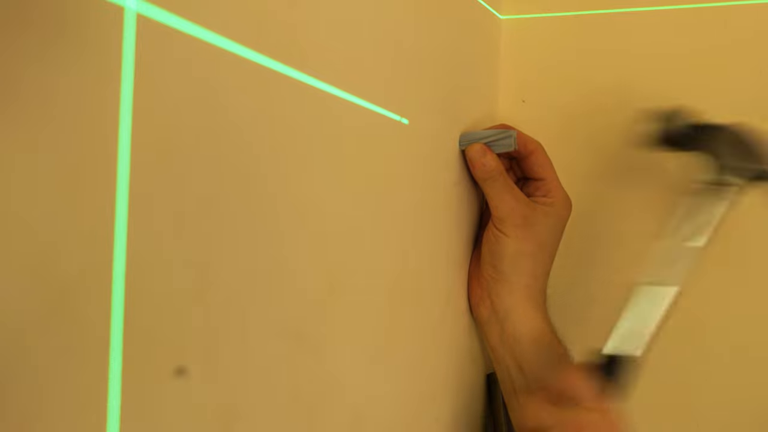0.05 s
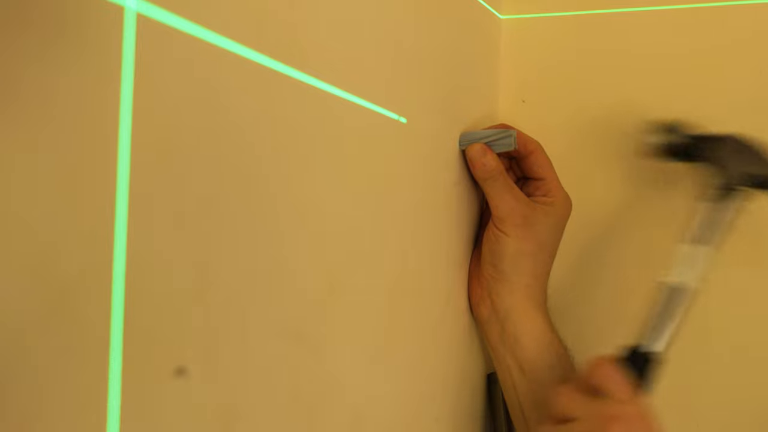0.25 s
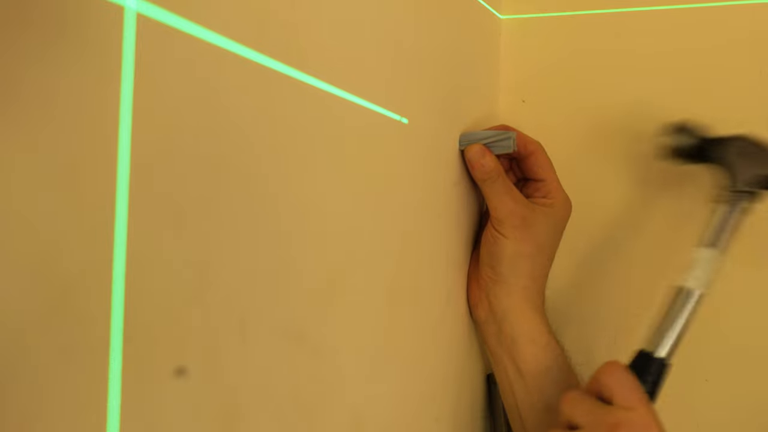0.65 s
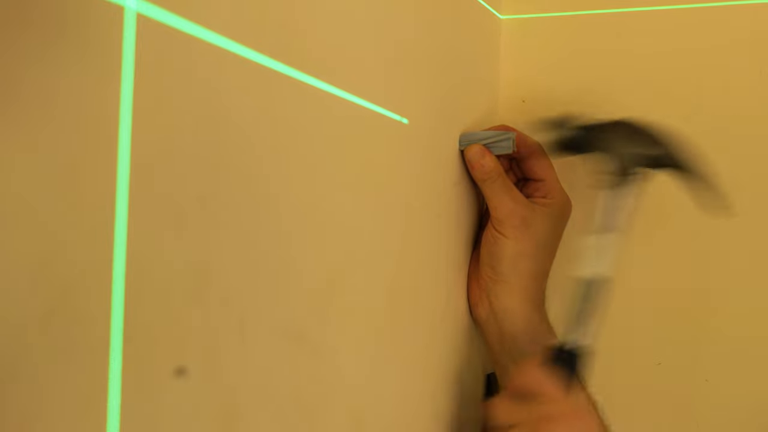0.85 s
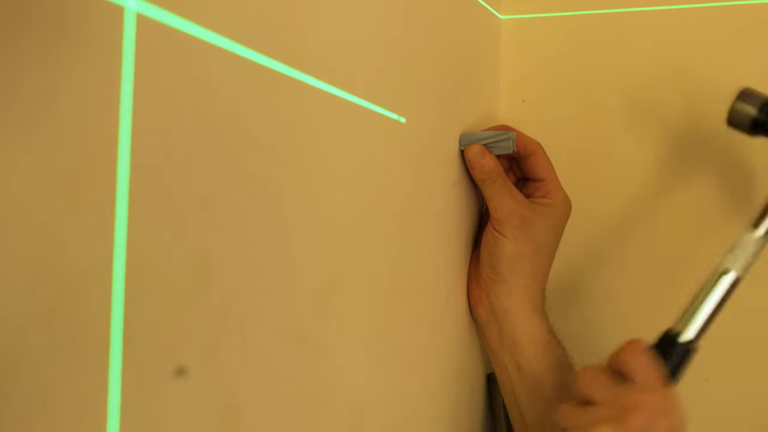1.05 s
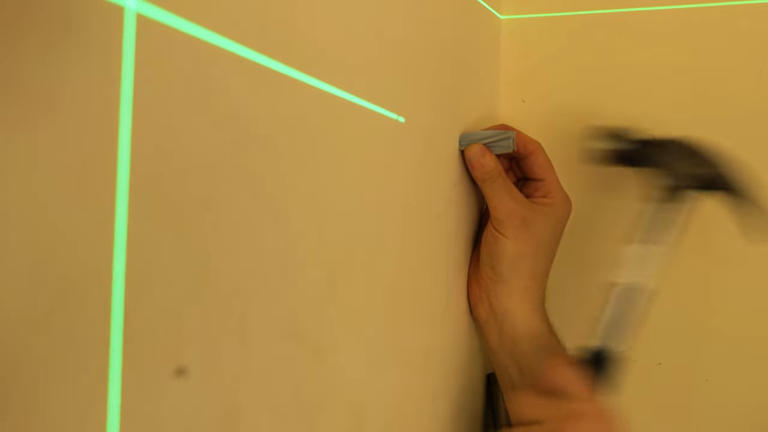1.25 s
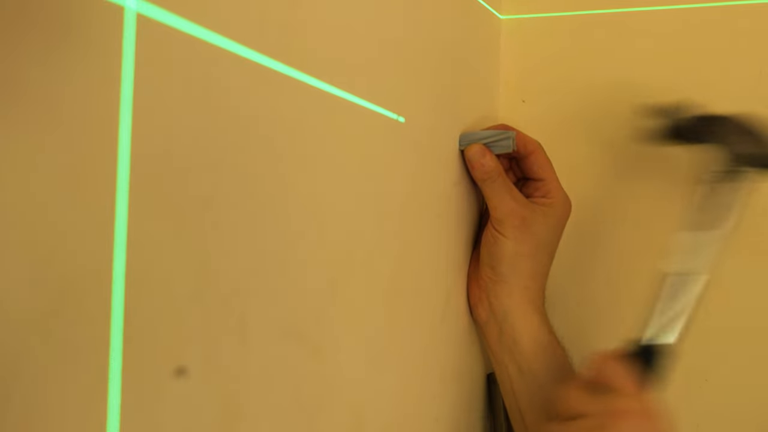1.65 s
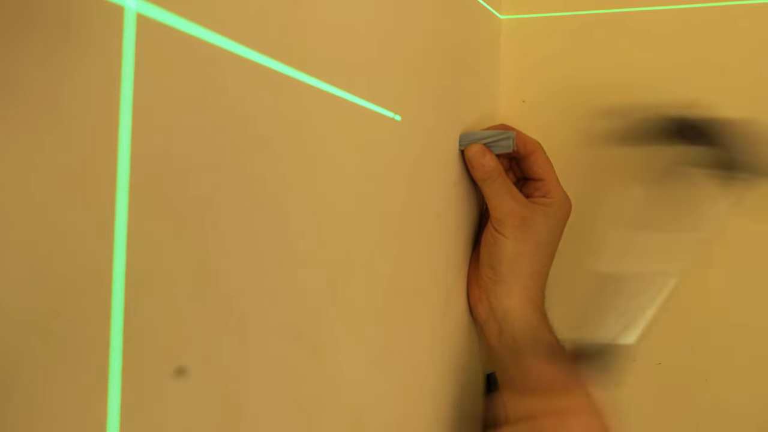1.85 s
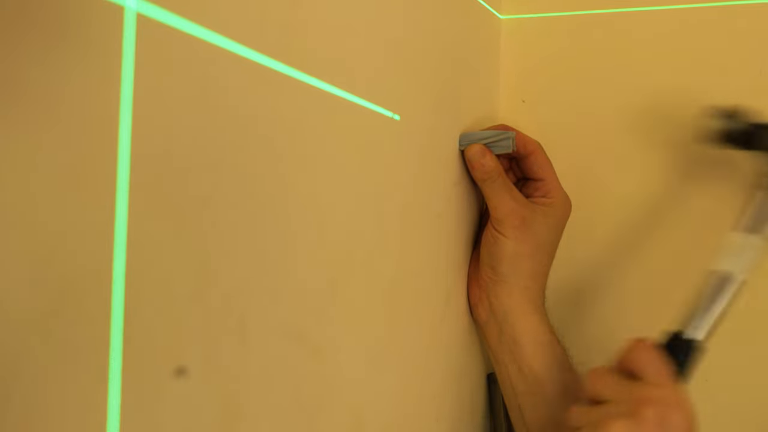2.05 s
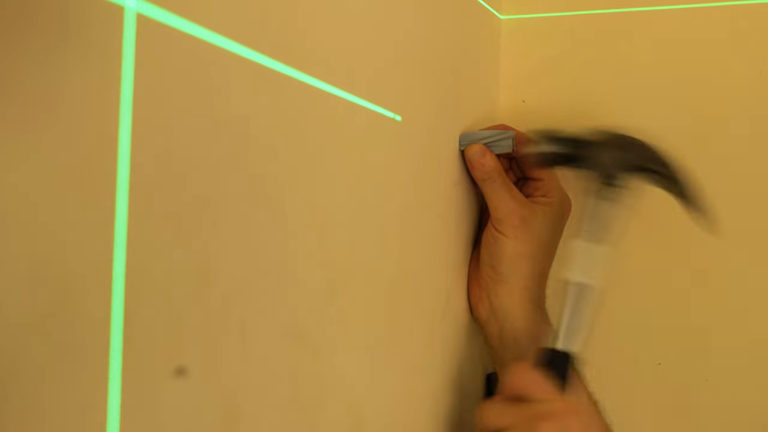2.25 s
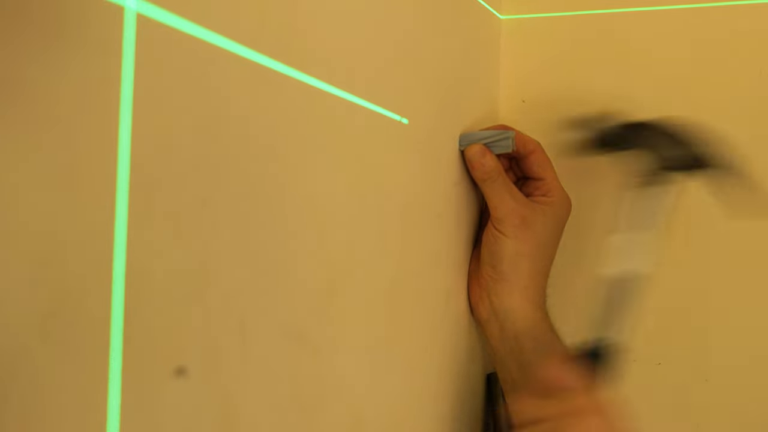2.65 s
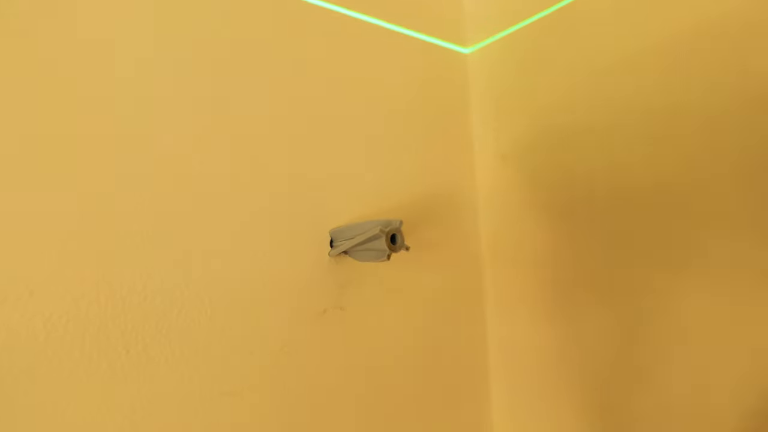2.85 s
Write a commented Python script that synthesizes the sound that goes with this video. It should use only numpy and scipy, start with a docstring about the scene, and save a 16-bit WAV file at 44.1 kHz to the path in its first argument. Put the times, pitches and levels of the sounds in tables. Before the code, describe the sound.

A hammer taps an anchor into a plasterboard wall, close by. Eight evenly spaced blows run from about 0.2 to 2.7 seconds, each a sharp tick over a hollow, booming thud with a short small-room echo. The ticks grow brighter from around 0.9 seconds, with a faint metal ring. The last blow's echo dips abruptly, leaving a faint low rumble over the quiet room hum.

```python
"""Sharp ticks over a hollow boom, about three a second: a steel hammer taps an anchor into plasterboard.
Each blow cracks on the anchor, pushes air off the board and sets the wall's modes booming.
The tick brightens as the anchor bites, and the hammer head rings faintly.
A small room answers over a low hum, and the close microphone flattens every peak."""
import sys
import numpy as np
from scipy import signal
from scipy.fft import rfft, irfft, next_fast_len
from scipy.io import wavfile

SR = 44100
rng = np.random.default_rng(int(sys.argv[2]) if len(sys.argv) > 2 else 0)


def transcribe(signal):
    """Save signal, clipped to [-1, 1], as a 16-bit WAV file at the path in sys.argv[1]."""
    frames = np.atleast_2d(signal).T
    limited = np.clip(frames, -1, 1)
    pcm = np.round(limited * 32767).astype(np.int16)
    wavfile.write(sys.argv[1], SR, pcm)


N = 132300


def undb(db):
    """Decibels to gain."""
    return 10 ** (np.asarray(db) / 20)


def along(points, hz):
    """Read (Hz, value) points on a log-frequency axis."""
    freqs, values = np.array(points, float).T
    return np.interp(np.log(np.maximum(hz, 1)), np.log(freqs), values)


def colour(x, points):
    """Minimum-phase EQ through (Hz, dB) points: nothing rings ahead of an attack."""
    n = x.shape[-1]
    size = 2 * next_fast_len(n // 2 + SR // 10)
    gain = undb(along(points, np.fft.rfftfreq(size, 1 / SR)))
    cepstrum = irfft(np.log(gain), size)
    cepstrum[1:size // 2] *= 2
    cepstrum[size // 2 + 1:] = 0
    return irfft(rfft(x, size) * np.exp(rfft(cepstrum)), size)[..., :n]


def ring(modes, t):
    """Struck modes: decaying sines that start at t = 0."""
    t = np.maximum(t, 0)
    return sum(undb(db) * np.sin(2 * np.pi * hz * t) * np.exp(-np.log(1000) * t / t60)
               for hz, db, t60 in modes)


def unit(x):
    """Scale each channel to an energy of 1."""
    return x / np.sqrt(np.sum(x ** 2, axis=-1, keepdims=True))


def widen(pair, side_db):
    """Turn two unrelated signals, as mid and side, into left and right."""
    return pair[0] + undb(side_db) * pair[1] * np.array([[1], [-1]])


def add(out, x, start):
    """Mix x into out at a start time in seconds."""
    i = int(round(start * SR))
    a, b = max(i, 0), min(i + x.shape[-1], N)
    out[:, a:b] += x[:, a - i:b - i]


# The dark bed of room air. Each row: frequency in Hz, relative level in dB.
AIR_EQ = [(20, -7.5), (50, -5.5), (130, -12.5), (250, -17), (500, -26.5), (1200, -33.5), (2500, -43),
          (6000, -44), (10000, -48), (16000, -61.5)]
# The deep rumble. Each row: frequency in Hz, relative level in dB.
RUMBLE_EQ = [(15, -17.5), (35, 1.5), (70, -1.5), (140, -7), (300, -24.5), (1000, -67.5)]
AIR_DB, HUM_HZ, HUM_DB = -67, 135, -66.5
RUMBLE_START_S, RUMBLE_RISE_S, RUMBLE_DB = 2.78, 0.02, -47.5

def room_tone():
    """Quiet air, a low hum and a rumble that swells in at the end."""
    t = np.arange(N) / SR
    air = unit(colour(rng.standard_normal(N), AIR_EQ)) * np.sqrt(N)
    rumble = unit(colour(rng.standard_normal(N), RUMBLE_EQ)) * np.sqrt(N)
    hum = np.sqrt(2) * np.sin(2 * np.pi * HUM_HZ * t)
    swell = np.clip((t - RUMBLE_START_S) / RUMBLE_RISE_S, 0, 1)
    return undb(AIR_DB) * air + undb(HUM_DB) * hum + undb(RUMBLE_DB) * swell * rumble


# The tail's decay before it dies away faster. Each row: frequency in Hz, seconds to fall 60 dB.
TAIL_DECAY = [(60, .38), (300, 0.48), (1000, 0.26), (3000, 0.27), (7000, 0.31), (10000, 0.22),
              (15000, 0.35)]
ROOM_LAG_S, ROOM_BUILD_S = 0.0042, 0.001
TAIL_KNEE_S, TAIL_LATE_FALL = 0.17, 0.4  # past the knee the tail falls 40% faster
THUD_SIDE_DB, TICK_SIDE_DB = -27.5, -19.5  # stereo width

def room_tail(t, eq, side_db):
    """Dense reflections, nearly the same left and right; the lows hang on longest."""
    hz = np.fft.rfftfreq(len(t), 1 / SR)
    edges = np.r_[0, np.geomspace(90, SR / 2, 13)]
    noise = rfft(rng.standard_normal((2, len(t))))
    age = np.maximum(t - ROOM_LAG_S, 0)
    fall = age + TAIL_LATE_FALL * np.maximum(age - TAIL_KNEE_S, 0)
    build = 1 - np.exp(-age / ROOM_BUILD_S)
    tail = 0
    for lo, hi in zip(edges[:-1], edges[1:]):
        band = irfft(noise * ((hz >= lo) & (hz < hi)), len(t))
        envelope = build * np.exp(-np.log(1000) * fall / along(TAIL_DECAY, (lo + hi) / 2))
        tail = tail + unit(band * envelope) * np.sqrt(2 * (hi - lo) / SR)
    return widen(colour(tail, eq), side_db)


# The boom: modes of the wall and the corner in front of it.
# Each row: pitch in Hz, level in dB, seconds to fall 60 dB.
WALL_MODES = [(54.4, -27, 0.67), (62, -35.5, 0.13), (76.3, -31, 0.33), (83.2, -30.5, 0.43), (99, -29, 0.42),
              (122.5, -26.5, 0.33), (134.86, -28, 0.48), (152, -27.5, 0.3), (198.5, -32.5, 0.36),
              (245.2, -29.5, 0.28), (286, -33, 0.26), (297.5, -29.5, 0.32), (317, -32, 0.13),
              (351, -31.5, 0.24), (419.8, -27.5, 0.14), (447.2, -41, 0.24), (517.3, -31.5, 0.28)]
# The knock of the board around the anchor. Each row: pitch in Hz, level in dB, seconds to fall 60 dB.
BOARD_MODES = [(475, -11.5, 0.019), (576, -40, 0.13), (619, -32.5, 0.11), (739, -35, 0.12),
               (756, -38.5, .22), (831, -42.5, 0.28), (942.3, -47, 0.4), (1017, -36, 0.23),
               (1072.4, -18, 0.026), (1162, -31.5, .13)]
# The push slapping back off nearby walls. Each row: delay in seconds, gain.
EARLY_ECHOES = [(.0078, 0.042), (0.013, .26), (0.0184, -.33), (.0445, .1)]
# The room's warm answer to the thud. Each row: frequency in Hz, gain in dB.
THUD_TAIL_EQ = [(25, -2), (60, 6), (130, 11.5), (320, 15.5), (430, 8.5), (560, 9.5), (720, 9.5),
                (1100, 10.5), (1400, -7), (2200, -17), (5000, -53)]
PUSH_S, PUSH_DB = 0.0019, -6
BOARD_LAG_S, WALL_LAG_S = 0.00052, 0.0017

def wall_thud(t):
    """The board gives way and pushes the air, the whole wall swings back, and the room answers."""
    def push(lag):
        progress = np.clip((t - BOARD_LAG_S - lag) / PUSH_S, 0, 1)
        return undb(PUSH_DB) * np.sin(np.pi * progress) ** 2
    boom = ring(BOARD_MODES, t - BOARD_LAG_S) - ring(WALL_MODES, t - WALL_LAG_S)
    slaps = sum(gain * push(lag) for lag, gain in EARLY_ECHOES)
    return push(0) + boom + slaps + room_tail(t, THUD_TAIL_EQ, THUD_SIDE_DB)


# The hard edge of the contact. Each row: frequency in Hz, gain in dB.
CRACK_EQ = [(300, -16.5), (900, 11), (1300, 9), (2000, -2.5), (4300, -2), (5600, -3.5), (7500, 1),
            (10000, -10), (13000, -6), (16000, -10.5)]
CRACK_DECAY_S = 0.0025

def contact_crack(t):
    """Steel meets the anchor: a very short burst of noise."""
    burst = unit(rng.standard_normal((2, len(t))) * np.exp(-t / CRACK_DECAY_S))
    return widen(colour(burst, CRACK_EQ), TICK_SIDE_DB)


# The anchor's short ping. Each row: pitch in Hz, level in dB, seconds to fall 60 dB.
ANCHOR_MODES = [(2580, -28, 0.022), (3315, -27, 0.014), (3878, -20.5, 0.008), (4461, -20, 0.012),
                (6160, -27, 0.0094), (9620, -27, 0.011), (11940, -31, 0.0071)]
# The room's bright answer to the tick. Each row: frequency in Hz, gain in dB.
TICK_TAIL_EQ = [(500, -2), (1500, 1.5), (2300, -5.5), (4500, -7), (6000, -7.5), (8000, -10.5),
                (10000, -18.5), (12500, -25.5), (16000, -46.5)]
# The blows. Each row: start in seconds, thud gain in dB, tick gain in dB, tick tilt in dB per octave,
# anchor gain within the tick in dB, gains of the hammer's lower and upper mode in dB.
HAMMER_BLOWS = [(-.144, -2, -8.5, -3, 0, -12, -18.5), (0.2121, 0.5, -3.5, -3, -3, -12.5, -18.5),
                (0.5676, -0.5, -3.5, -1.5, -3, 0.5, -11), (.9111, -0.5, -1, -1.1, 2, 4.5, -11.5),
                (1.2708, 0.5, -0.5, -1.5, -1.5, 3, -11.5), (1.6313, -0.5, 1, 0.5, 1, -9, 4),
                (1.9822, -1, 0.5, -1.5, 0.5, -12.5, 4.5), (2.3346, -0.9, 0, -1, -1.5, -9, 5.5),
                (2.6947, -1.5, 2.5, 0.35, 0.5, 3, -1.5)]
HEAD_MODES_HZ, HEAD_DB, HEAD_T60_S = (5940, 6001), -70.5, 0.8
BLOW_LENGTH_S = 0.7
DROP_START_S, DROP_FALL_S, DROP_DB = 2.748, 0.0047, -5.5  # the last tail ducks abruptly

def hammering():
    """Every blow lands on one spot and sounds the wall, the anchor and two close hammer-head modes."""
    t = np.arange(int(BLOW_LENGTH_S * SR)) / SR
    thud = wall_thud(t)
    ping = ring(ANCHOR_MODES, t)
    tick_tail = room_tail(t, TICK_TAIL_EQ, TICK_SIDE_DB)
    head_low, head_high = (ring([(hz, HEAD_DB, HEAD_T60_S)], t) for hz in HEAD_MODES_HZ)
    out = np.zeros((2, N))
    for start, thud_db, tick_db, tilt, anchor_db, low_db, high_db in HAMMER_BLOWS:
        tilt_eq = [(1000, -2 * tilt), (16000, 2 * tilt)]  # two octaves either side of 4 kHz
        tick = colour(contact_crack(t) + undb(anchor_db) * ping + tick_tail, tilt_eq)
        head = undb(low_db) * head_low + undb(high_db) * head_high
        add(out, undb(thud_db) * thud + undb(tick_db) * tick + head, start)
    drop = np.clip((np.arange(N) / SR - DROP_START_S) / DROP_FALL_S, 0, 1)
    return out * undb(DROP_DB * drop)


def scene():
    """Hammering up front, quiet room tone behind."""
    return hammering() + room_tone()


LOW_CUT_HZ, HIGH_CUT_HZ = 34, 16300
CEILING, CLIP_HARDNESS = 0.25, 2.2

def record(dry):
    """The microphone loses the deepest bass and overloads softly on each blow; the top is cut."""
    lean = signal.sosfilt(signal.butter(1, LOW_CUT_HZ, "high", fs=SR, output="sos"), dry)
    squashed = lean / (1 + np.abs(lean / CEILING) ** CLIP_HARDNESS) ** (1 / CLIP_HARDNESS)
    return signal.sosfilt(signal.ellip(8, .2, 70, HIGH_CUT_HZ, fs=SR, output="sos"), squashed)


dry = scene()
out = record(dry)
transcribe(out)
```